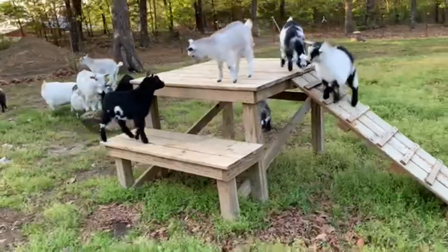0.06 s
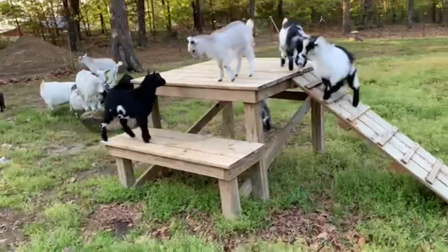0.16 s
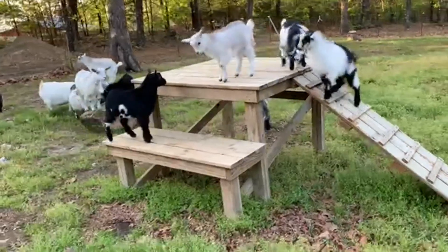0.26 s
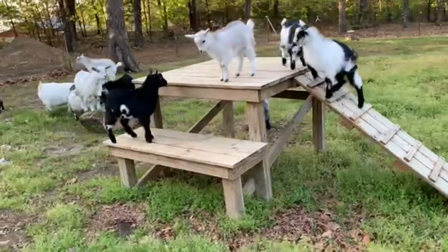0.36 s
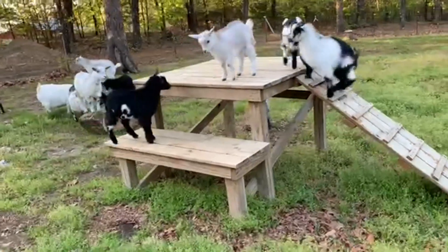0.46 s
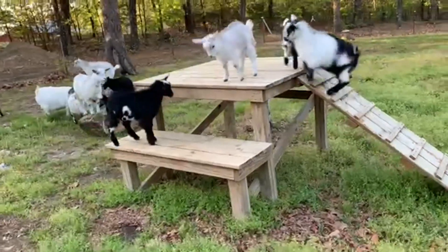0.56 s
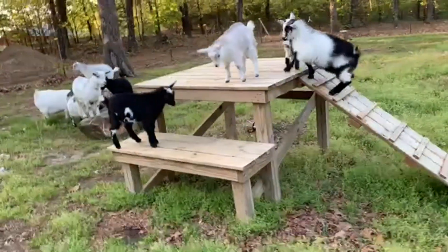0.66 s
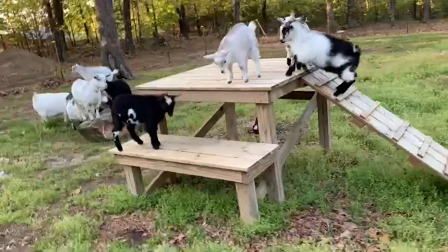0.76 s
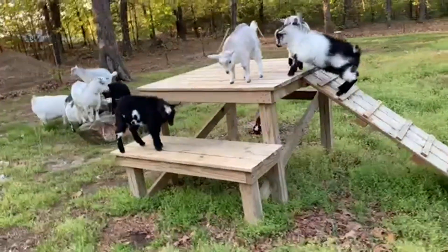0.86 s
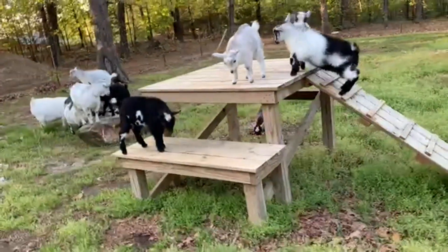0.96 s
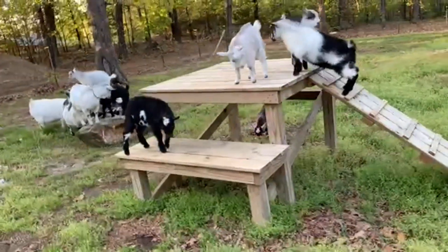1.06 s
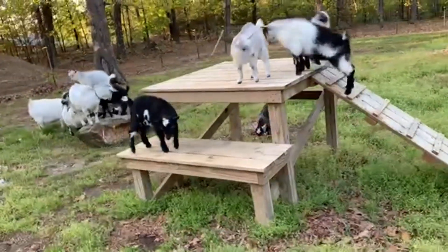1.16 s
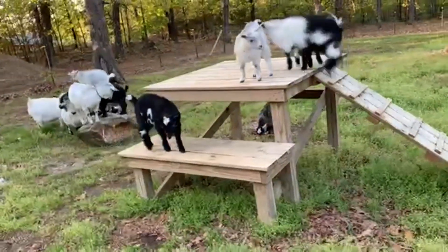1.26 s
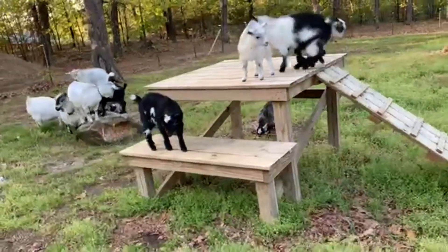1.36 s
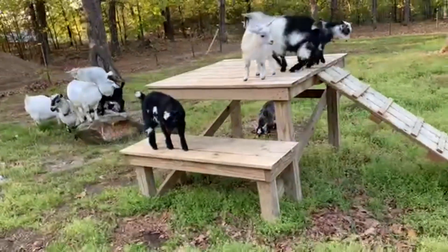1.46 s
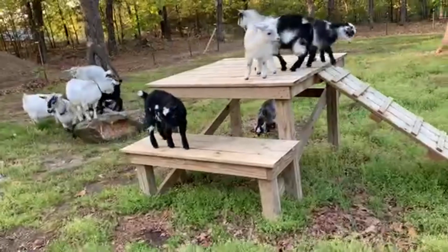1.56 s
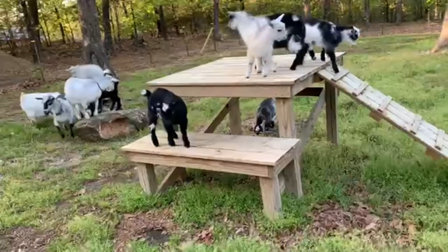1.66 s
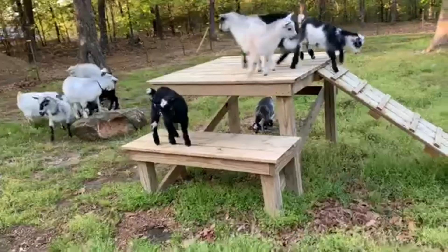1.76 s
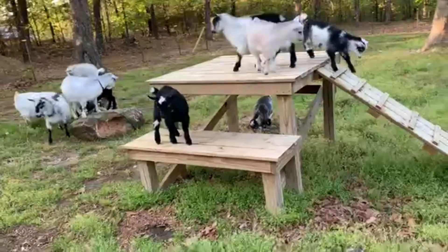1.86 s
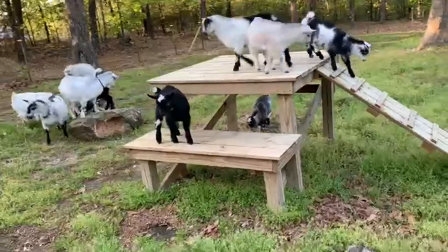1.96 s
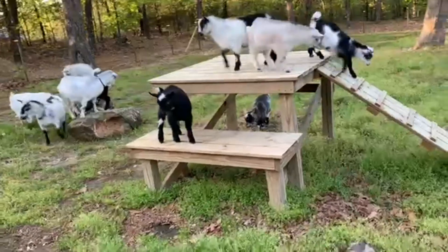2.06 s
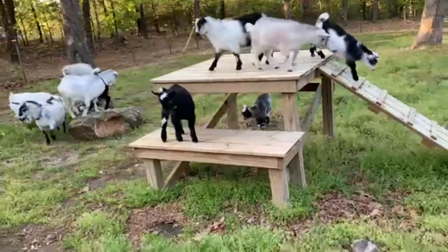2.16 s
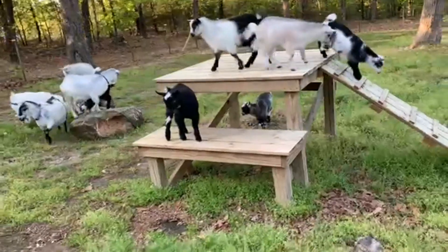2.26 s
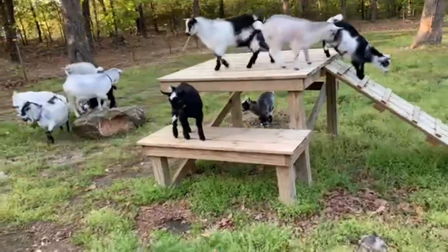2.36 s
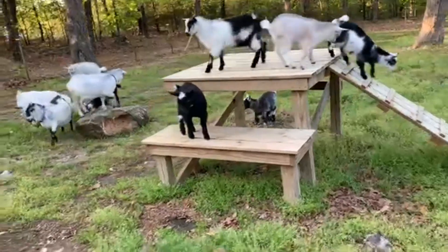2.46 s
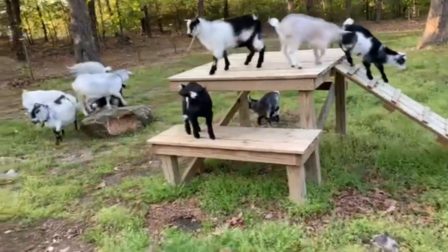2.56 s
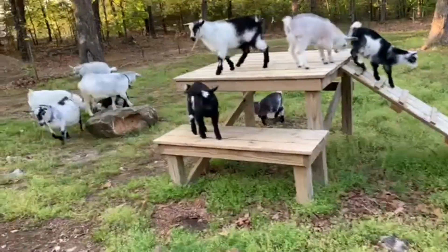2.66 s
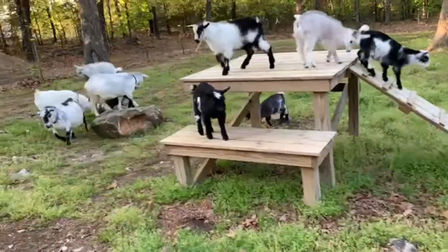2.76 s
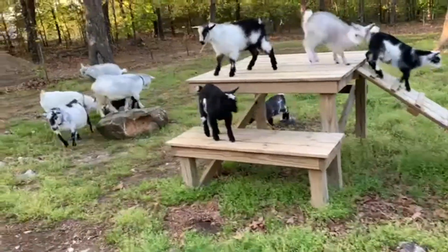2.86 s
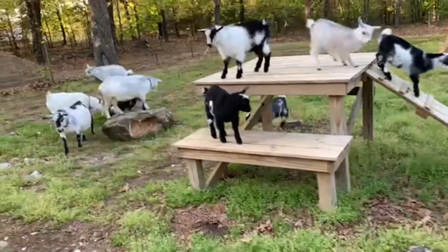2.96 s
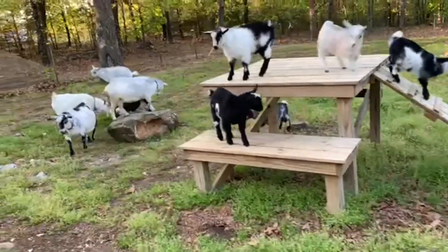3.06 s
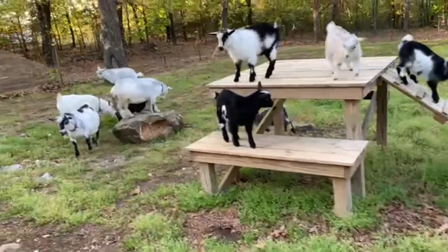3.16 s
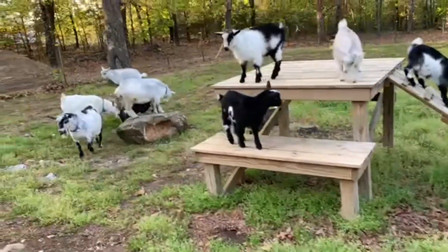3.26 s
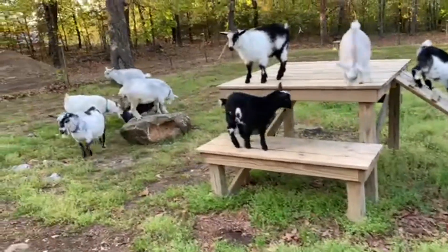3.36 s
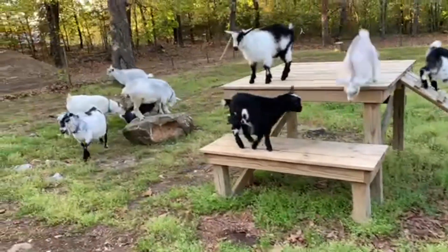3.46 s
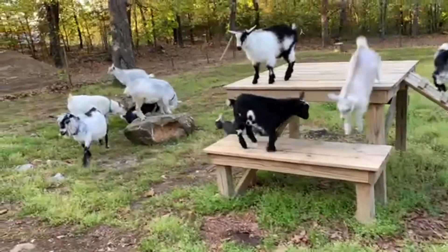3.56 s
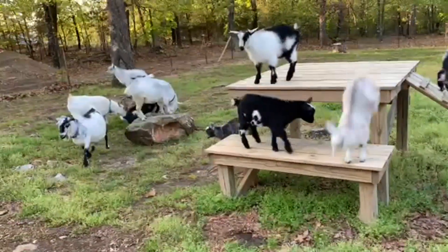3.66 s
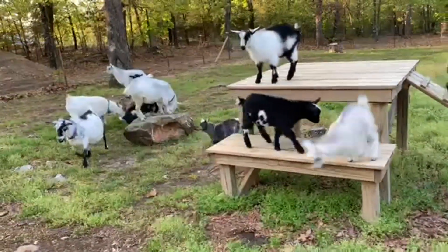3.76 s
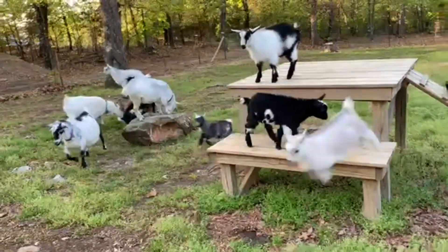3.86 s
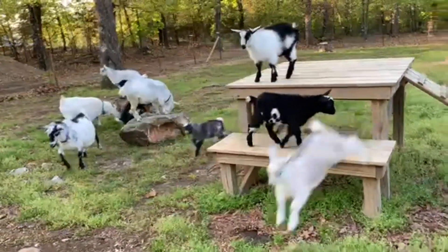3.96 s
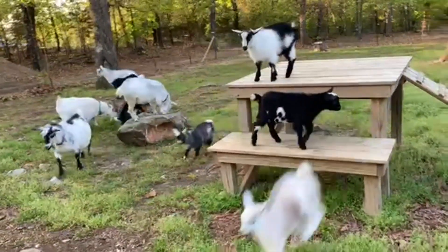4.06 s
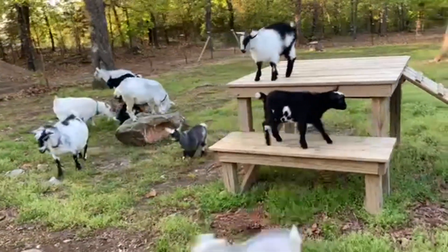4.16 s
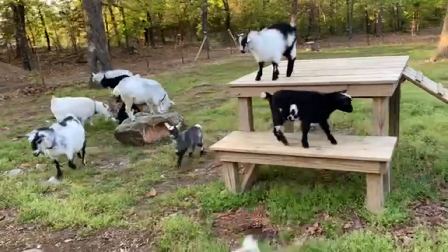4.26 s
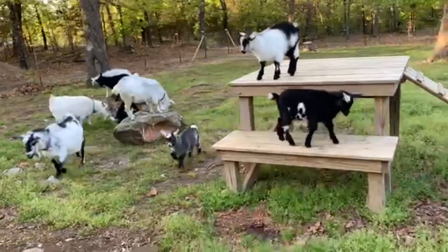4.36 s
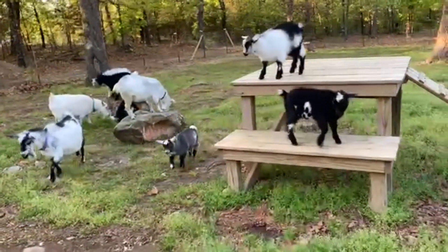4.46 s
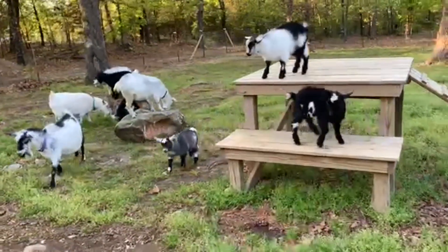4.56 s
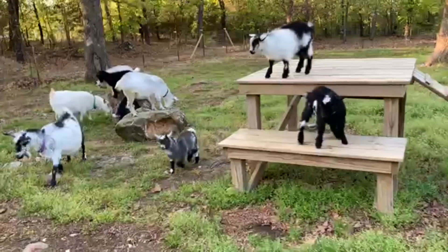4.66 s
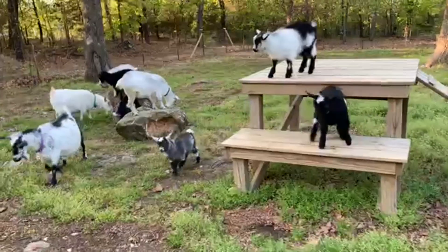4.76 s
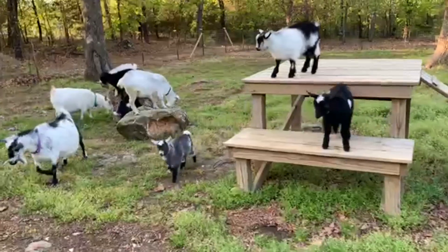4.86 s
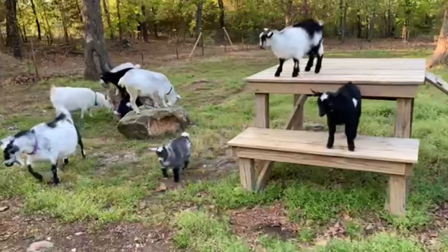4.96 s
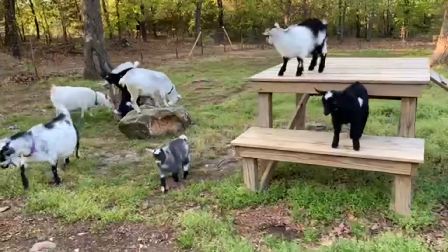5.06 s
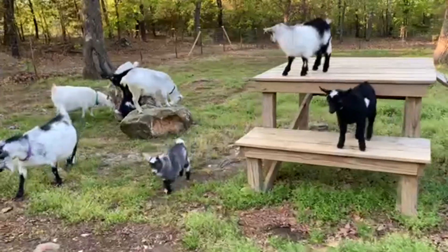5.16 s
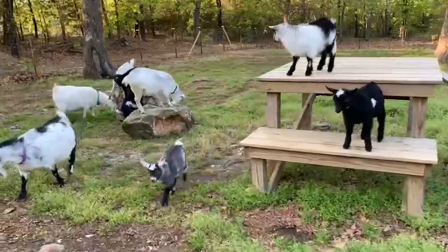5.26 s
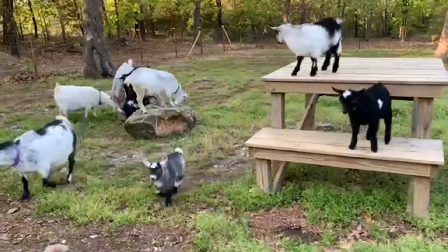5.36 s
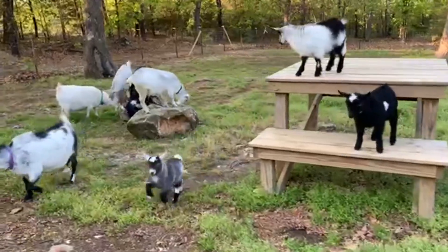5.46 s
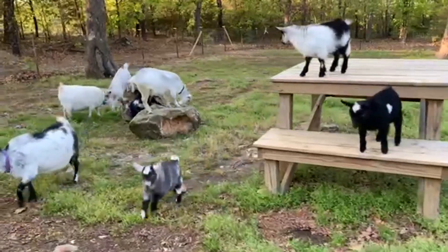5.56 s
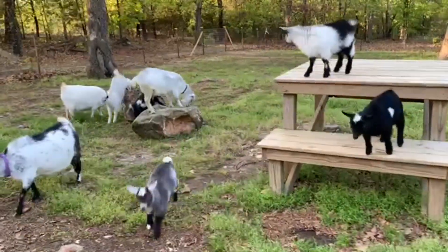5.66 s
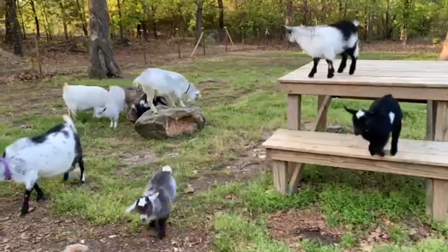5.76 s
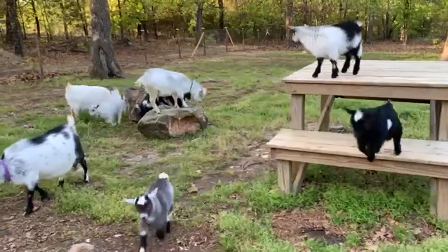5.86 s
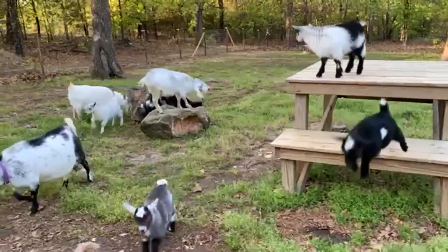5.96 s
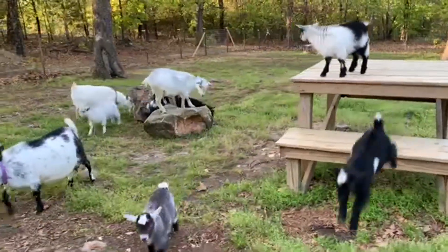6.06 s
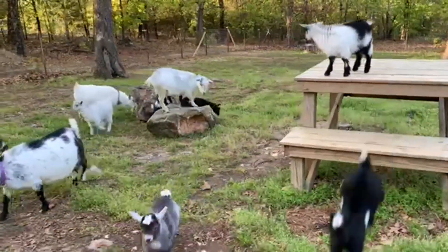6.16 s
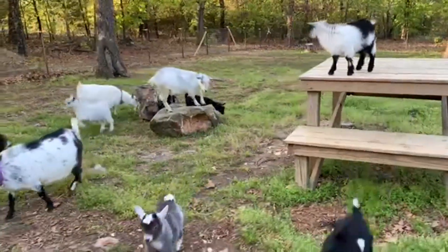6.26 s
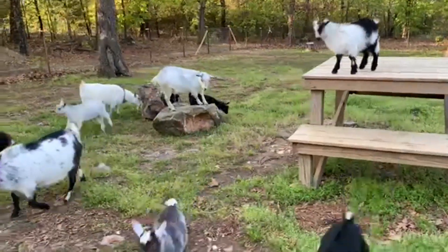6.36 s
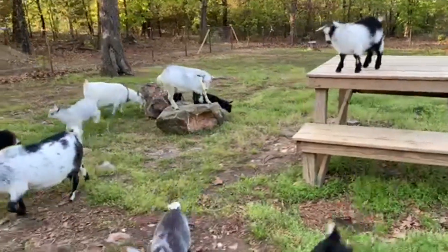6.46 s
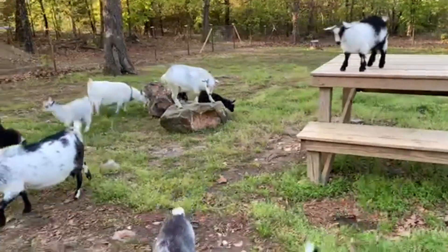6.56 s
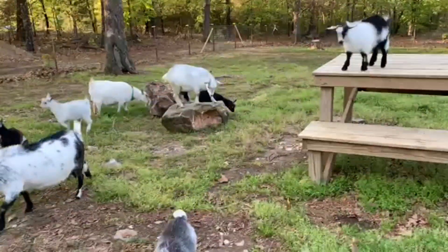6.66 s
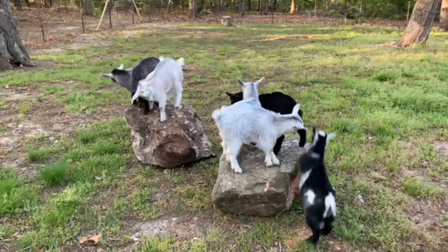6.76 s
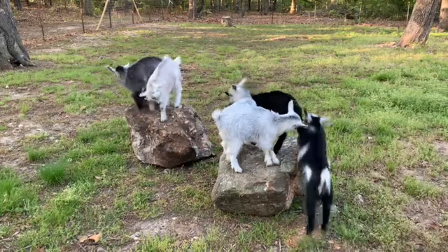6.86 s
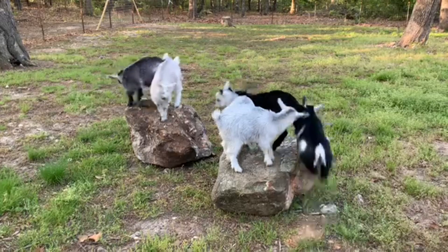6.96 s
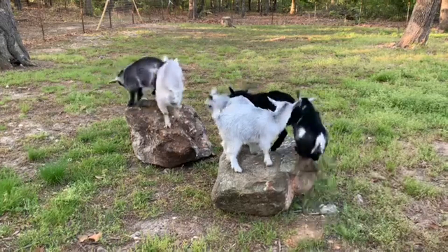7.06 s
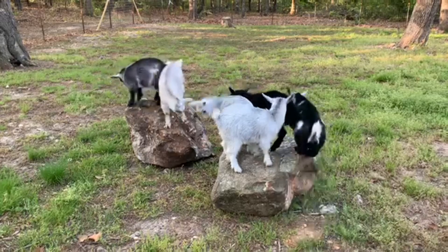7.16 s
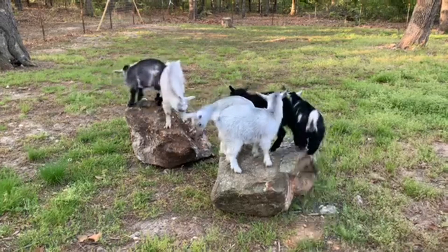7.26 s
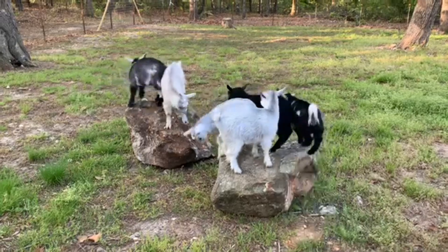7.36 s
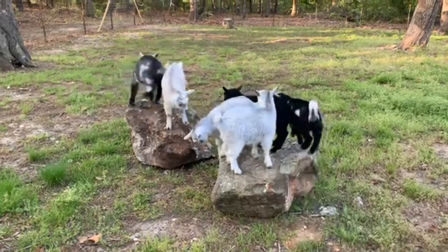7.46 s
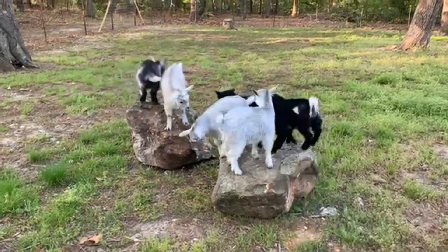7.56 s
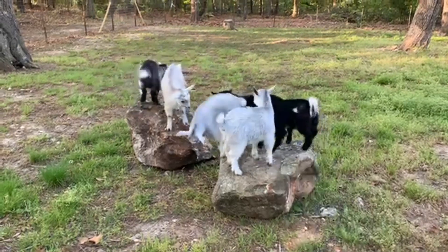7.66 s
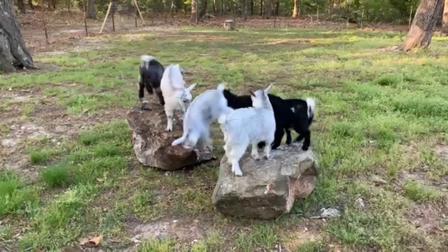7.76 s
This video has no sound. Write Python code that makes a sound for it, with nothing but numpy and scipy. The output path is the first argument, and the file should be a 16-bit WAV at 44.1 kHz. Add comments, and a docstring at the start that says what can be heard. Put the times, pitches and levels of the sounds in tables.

```python
"""Young goats on a wooden play deck

Hooves set the modes of the boards ringing, click as they strike and come down flat in dull thuds.
Close by, feet scuff the earth, crunch and swish through dry grass, and break twigs and a thick stick.
Short bright pings come from a dry stick ringing in a crunch, others perhaps from hooves on stone.
The ground rumbles under the landings, and faint whistles, likely frogs or birds, come from far off.
Two microphone ports pick up the yard and its short echo; near the end the sound dips briefly to silence."""
import sys
import numpy as np
from scipy import signal
from scipy.fft import rfft, irfft, next_fast_len
from scipy.io import wavfile
from scipy.ndimage import uniform_filter1d, map_coordinates

SR = 44100
rng = np.random.default_rng(int(sys.argv[2]) if len(sys.argv) > 2 else 0)


def persist_wave(psi):
    """Save psi, clipped to +-1, as 16-bit WAV."""
    counts = np.round(np.clip(psi, -1, 1) * 32767).astype(np.int16)
    wavfile.write(sys.argv[1], SR, np.atleast_2d(counts).T)


N = 344421

# Short modes of hoof and board edge. Each row: frequency in Hz, level in dB, t60 in seconds.
CLACK_MODES = [(705, 6, 0.026), (940, 4, 0.024), (1150, 7, 0.016), (1400, 3, 0.016), (1710, 0, 0.018),
               (2136, 7, 0.014), (2620, 5, 0.011), (3600, 8, 0.009)]
# Spectra of dry grass, its crackle and its fizz. Each row: frequency in Hz, relative density in dB.
CRACKLE_SPECTRUM = [(1300, -5), (2300, -1), (3300, -3), (4500, 3), (6000, -8), (7500, -2.5), (9000, -23)]
FIZZ_SPECTRUM = [(5500, -7), (7500, -7), (10000, 12.5), (13000, 9), (15500, 9.5), (17000, -27.5)]
# Coherence between the two ports. Each row: frequency in Hz, likeness from 0 to 1.
COHERENCE = [(150, 0.83), (300, 0.95), (1000, 0.66), (3200, 0.16), (6500, 0.66), (8300, 0.75),
             (16000, 0.79)]


def amp(db):
    """Amplitude grows tenfold for every 20 dB."""
    return 10 ** (np.asarray(db) / 20)


def unit(x):
    """Normalisation to an rms of 1."""
    return x / np.sqrt(np.mean(x ** 2) + 1e-20)


def along(points, hz):
    """Interpolation of (Hz, value) points on a logarithmic frequency axis."""
    knots_hz, values = np.transpose(points)
    return np.interp(np.log(hz + 1), np.log(knots_hz + 1), values)


def curves(rows):
    """Linear interpolation in time: one envelope for each column after the first."""
    times, *columns = np.transpose(rows)
    return [np.interp(np.arange(N) / SR, times, column) for column in columns]


def wobble(rate):
    """Smooth random modulation: a spline through rate knots a second."""
    knots = rng.standard_normal(int(N * rate / SR) + 4)
    return map_coordinates(knots, [np.arange(N) * rate / SR])


def filtered(x, response):
    """Linear filtering: the spectrum is multiplied by a complex frequency response."""
    size = next_fast_len(N + 8192)
    return irfft(rfft(x, size) * response(np.fft.rfftfreq(size, 1 / SR)), size)[..., :N]


def grainy(spectrum, spread_db, patchy_db):
    """Tiny snaps of uneven size add up to coloured noise of rms 1, its colour shifting in patches."""
    grains = rng.standard_normal(N) * amp(spread_db * np.minimum(rng.exponential(size=N), 5))
    frames = signal.stft(grains, nperseg=256)[2]
    patches = uniform_filter1d(rng.standard_normal(frames.shape), size=4, axis=0)
    patches = uniform_filter1d(patches, size=8, axis=1)
    patchy = signal.istft(frames * amp(patchy_db * unit(patches)), nperseg=256)[1][:N]
    return unit(filtered(patchy, lambda hz: amp(along(spectrum, hz))))


def add(track, start, sound):
    """Superposition: a sound joins the track at start seconds."""
    part = track[round(start * SR):][:len(sound)]
    part += sound[:len(part)]


def ring(hz, db, t60, t):
    """Free vibration: a sum of damped modes, scaled to a peak of 1."""
    wave = (amp(db[:, None] - 60 * t / t60[:, None]) * np.sin(2 * np.pi * hz[:, None] * t)).sum(0)
    return wave / np.abs(wave).max()


def blows(t, first, density, t60):
    """Impulsive excitation: a first blow, then a dying run of random ones, density of them per sample."""
    train = rng.standard_normal(len(t)) * (rng.uniform(size=len(t)) < density) * amp(-60 * t / t60)
    train[0] = first
    return train


def scuff_and_swish():
    """Friction noise: feet scuff the earth and brush the grass in uneven strokes."""
    # Each row: time in seconds, then levels in dB of scuffing, grass crackle and grass fizz.
    friction_levels = [(0.0, -39.5, -53, -57), (1.32, -53.5, -54.5, -61.5), (1.7, -41, -55, -63),
                       (2.71, -42, -45.5, -53), (3.36, -37.5, -49.5, -60), (4.13, -43, -48, -54),
                       (4.27, -35, -44.5, -44), (5.05, -38.5, -49, -57), (6.38, -39.5, -46.5, -41),
                       (6.66, -45.5, -60.5, -49.5), (6.8, -42.5, -47, -49), (6.844, -37, -64, -63.5),
                       (6.98, -50, -60, -57), (7.3, -40.5, -65, -70.5), (7.81, -53.5, -67.5, -73)]
    # Spectrum of scuffed earth. Each row: frequency in Hz, relative density in dB.
    earth_spectrum = [(76, -5), (130, 3.5), (367, -3.5), (471, -17.5), (574, -6), (699, -22.5), (941, -9),
                      (2500, -22), (3250, -17), (5500, -120)]
    scuff_db, crackle_db, fizz_db = curves(friction_levels)
    stroke, flutter = wobble(23), wobble(99)
    scuff = amp(scuff_db + stroke + 2 * wobble(40)) * grainy(earth_spectrum, spread_db=1, patchy_db=3)
    crackle = amp(crackle_db + 3.1 * stroke + 0.37 * flutter)
    crackle *= grainy(CRACKLE_SPECTRUM, spread_db=2, patchy_db=2)
    fizz = amp(fizz_db + 0.86 * stroke + 0.89 * flutter)
    fizz *= grainy(FIZZ_SPECTRUM, spread_db=1.5, patchy_db=2)
    return scuff, crackle + fizz


def ground_rumble():
    """Ground vibration: many feet merge into low noise; a heavy landing is a few cycles of a low note."""
    # Spectrum of the shaken earth. Each row: frequency in Hz, relative density in dB.
    ground_spectrum = [(20, -88), (33, -20.5), (55, -6.5), (80, -2.5), (110, -8.5), (190, -63)]
    # Strength of the steady rumble. Each row: time in seconds, level in dB.
    rumble_levels = [(0, -46.5), (4.4, -42.5), (6.7, -43.5), (6.75, -50.5)]
    # Heavy landings. Each row: time of the peak in seconds, level in dB, pitch in Hz.
    landings = [(1.733, -33.5, 75), (2.683, -31, 89), (2.963, -26, 107), (3.69, -16.5, 79),
                (3.798, -24.5, 82.5), (4.15, -32.5, 70), (4.395, -28.5, 85), (4.487, -23, 102),
                (4.779, -30, 90), (5.805, -30, 79.5), (6.42, -24, 109.7), (6.477, -25, 100)]
    rise_s, fall_s = 0.018, 0.039
    level_db, = curves(rumble_levels)
    track = amp(level_db + 1.5 * wobble(2.983))
    track *= unit(filtered(rng.standard_normal(N), lambda hz: amp(along(ground_spectrum, hz))))
    t = np.arange(-SR // 20, SR // 5) / SR
    swell = np.where(t < 0, np.exp(-(t / rise_s) ** 2), np.exp(-t / fall_s))
    for peak_s, db, hz in landings:
        add(track, peak_s + t[0], amp(db) * swell * np.sin(2 * np.pi * (hz * t + rng.uniform())))
    return track


def hoof_knocks():
    """Modal resonance: a hoof excites most the modes nearest in pitch to the spot it strikes."""
    # Hooves on boards. Each row: start in seconds, boom level in dB, boom pitch in Hz,
    # clack level in dB, clack pitch in Hz.
    knocks = [(0.007, -9.5, 215, -20.5, 1060), (0.051, -16, 209, -25.5, 1280), (0.204, -41, 250, -24, 1160),
              (0.326, -22, 410, -23, 1130), (0.489, -19, 192, -27, 1190), (0.556, -19.5, 383, -19.5, 1250),
              (0.712, -10.5, 406, -22, 1400), (0.735, -7, 256, -22.5, 940),
              (0.788, -16.5, 380, -26.5, 1530), (0.877, -11, 408, -34, 2100), (0.892, -7.5, 517, -61, 945),
              (1.281, -17, 307, -20, 1060), (1.336, -14.5, 290, -23.5, 1340), (1.409, -22, 185, -27, 1360),
              (1.59, -16.5, 410, -29, 886), (1.696, -13.5, 211, -23, 1520), (1.746, -22, 198, -15, 1060),
              (1.766, -24, 390, -23, 1020), (1.885, -12, 238, -20.5, 1190), (2.205, -13, 200, -21.5, 1080),
              (2.52, -14, 208, -24, 1290), (2.723, -52, 193, -25.5, 1040), (2.935, -7.5, 402, -26, 930),
              (2.939, -5, 182, -57, 915), (3.038, -18, 254, -27, 970), (3.169, -9, 218, -17, 1000),
              (3.438, -20.5, 192, -21, 1130), (3.606, -12.5, 378, -57, 724), (3.65, -6, 460, -12, 1200),
              (3.659, -7, 470, -10, 1140), (3.672, -0.5, 263, -9, 1170), (3.745, -16.5, 600, -26.5, 720),
              (3.77, -5.5, 310, -8.5, 1260), (3.862, -15, 486, -42, 1090), (3.895, -11.5, 208, -26, 1230),
              (4.084, -14.5, 193, -48, 821), (4.172, -11, 244, -29, 1110), (4.201, -8, 370, -19.5, 1150),
              (4.234, -11, 185, -30.5, 1010), (4.334, -6.5, 353, -20, 740), (4.386, -15, 265, -42, 1010),
              (4.418, -8.5, 595, -21, 710), (4.683, -2.5, 296, -14, 770), (4.782, -13, 470, -44, 716),
              (4.882, -16.5, 269, -30, 1900), (5.634, -17, 213, -30, 970), (5.774, -9.5, 285, -19, 1160),
              (5.811, -10, 216, -15, 1120), (6.562, -12.5, 397, -19.5, 1210),
              (6.633, -48, 420, -23.5, 1150), (6.804, -20.5, 312, -32, 1070), (7.205, -21.5, 297, -33, 820)]
    # Modes of the deck. Each row: frequency in Hz, level in dB, t60 as a multiple of the boom's.
    board_modes = [(185.7, -5.5, 1.73), (210.1, -3.5, 1.97), (272, 4.5, 0.71), (316.7, 2.5, 0.78),
                   (380.4, 0.5, 1.2), (417, -2.5, 0.85), (508, -0.5, 1.04), (597, 2, 0.92)]
    usual_t60_s, usual_db, damping = 0.19, -23.5, 0.24
    spot_db, detune = 20.5, 0.03  # loss per unit of log pitch from the struck spot; relative spread
    boom_rise_s, clack_rise_s = 0.0034, 0.0021
    track, t = np.zeros(N), np.arange(SR // 5) / SR
    board_hz, board_db, t60_ratio = np.transpose(board_modes)
    edge_hz, edge_db, edge_t60 = np.transpose(CLACK_MODES)
    for start, boom_db, boom_hz, clack_db, clack_hz in knocks:
        chance = rng.standard_normal((4, len(board_hz)))
        # A heavier hoof damps the board more.
        t60 = np.clip(usual_t60_s * amp(damping * (usual_db - boom_db)), 0.03, 0.3)
        mode_db = board_db - spot_db * np.abs(np.log(board_hz / boom_hz)) + 3 * chance[1]
        boom = ring(board_hz * (1 + detune * chance[0]), mode_db, t60_ratio * t60, t)
        mode_db = edge_db - spot_db * np.abs(np.log(edge_hz / clack_hz)) + 3.1 * chance[3]
        clack = ring(edge_hz * (1 + 2 * detune * chance[2]), mode_db, edge_t60, t)
        scuffle = blows(t[:SR // 20], first=1.4, density=0.035, t60=0.06)  # the hoof slides and settles
        clack = signal.fftconvolve(clack * (1 - np.exp(-t / clack_rise_s)), scuffle)
        add(track, start, amp(boom_db) * boom * (1 - np.exp(-t / boom_rise_s)))
        add(track, start, amp(clack_db) * clack / np.abs(clack).max())
    return track


def sharp_clicks():
    """Transients: snapping twigs and striking hooves ring for two or three cycles, with a noisy tail."""
    # Each row: start in seconds, level in dB, pitch in Hz.
    clicks = [(.452, -33, 9050), (.617, -22.5, 1590), (5.028, -23, 2000), (6.303, -15.5, 4500),
              (0.996, -36, 9000), (1.32, -27, 9000), (5.503, -18, 6100), (5.657, -20, 4200),
              (0.8637, 1, 1340), (0.865, -4.5, 2930), (1.385, -26.5, 4300), (1.912, -24.5, 2560),
              (2.04, -26, 9460), (2.249, -14, 5130), (2.907, -9.5, 3780), (2.661, -14.5, 2780),
              (2.931, -13, 1790), (2.9617, -17.5, 7800), (3.328, -7, 4830), (3.652, -16, 1290),
              (4.3523, -5.5, 2610), (4.537, -1.5, 4360), (4.5965, -6, 3490), (5.341, -14, 4320),
              (5.7285, -8, 8460), (6.3268, -6, 10000), (6.37, -24.5, 5000), (6.413, -11.5, 4420)]
    rise_cycles, decay_cycles = 0.6, 1.37
    track, t = np.zeros(N), np.arange(SR // 50) / SR
    for start, db, hz in clicks:
        envelope = 2 * np.exp(-t * hz / decay_cycles) * (1 - np.exp(-t * hz / rise_cycles))
        click = envelope * np.sin(2 * np.pi * hz * t)
        tail = 0.14 * rng.standard_normal(len(t)) * amp(-60 * t / 0.018)
        add(track, start, amp(db) * (click + tail * min(hz / 8000, 1)))
    return track


def grass_crunches():
    """Crushing noise lasts while a foot drags, then decays: thick stalks sound dull, dry blades fizz."""
    # Each row: start in seconds, dull level in dB, fizz level in dB, drag in seconds,
    # t60 of the crackle in seconds.
    treads = [(0.608, -53.5, -45, 0.011, 1), (0.786, -34.5, -41, 0.0033, 0.042),
              (0.873, -17, -51, 0.0027, 0.0086), (1.41, -40, -75, 0.067, 0.09),
              (1.381, -56, -44.5, 0.0034, 0.95), (1.937, -27.5, -41, 0.011, 0.1),
              (2.034, -72, -46.5, 0.0065, 0.42), (2.243, -24, -30.5, 0.0017, 0.13),
              (2.542, -65, -32.5, 0.0089, 0.13), (2.639, -31.5, -55, 0.03, 0.16),
              (2.776, -43, -38.5, 0.004, 0.74), (2.822, -40, -55, 0.12, 0.16),
              (3.323, -22, -22, 0.002, 0.14), (3.367, -30, -45.5, 0.058, 0.26),
              (3.647, -39.5, -37, 0.0088, 0.86), (3.766, -26, -38, 0.0033, 0.022),
              (3.831, -35, -51, 0.045, 0.036), (4.032, -37, -41, 0.075, 0.31),
              (4.116, -66, -33, 0.0065, 0.091), (4.148, -39.5, -32, 0.016, 0.5),
              (4.331, -28.5, -35, 0.083, 0.082), (4.423, -28, -37, 0.062, 0.033),
              (4.521, -44.5, -24, 0.011, 0.062), (4.616, -44, -40, 0.076, 0.038),
              (4.769, -43, -40.5, 0.0019, 0.36), (4.847, -40.5, -46, 0.06, 0.3),
              (5.15, -34, -50, 0.017, 0.041), (5.169, -23.5, -21.5, 0.0055, 0.085),
              (5.209, -38.5, -41, 0.027, 0.35), (5.336, -39, -45, 0.0045, 0.63),
              (5.456, -43.5, -38, 0.035, 0.41), (5.605, -42.5, -34, 0.075, 0.4),
              (5.721, -36.5, -32.5, 0.011, 0.091), (5.758, -39.5, -37.5, 0.088, 0.22),
              (5.892, -57, -31, 0.029, 0.065), (6.052, -64, -35.5, 0.014, 0.09),
              (6.098, -47, -31.5, 0.12, 0.38), (6.28, -53, -27, 0.058, 0.041),
              (6.355, -46, -26.5, 0.016, 0.31), (6.45, -60.5, -31, 0.019, 0.25),
              (6.552, -38.5, -40, 0.011, 0.51), (7.012, -30.5, -33, 0.038, 0.19),
              (7.03, -40, -42, 0.032, 0.59), (7.259, -45.5, -64, 0.0052, 0.13),
              (7.408, -45.5, -57, 0.0025, 0.28)]
    # Spectrum of thick stalks. Each row: frequency in Hz, relative density in dB.
    stalk_spectrum = [(300, -8.5), (620, -3.5), (800, -3.5), (920, -3), (1620, -9.5), (1900, -11.5),
                      (2400, -14), (3500, -47)]
    crackle, dull, fizz = np.zeros((3, N))
    t = np.arange(SR // 2) / SR
    for start, dull_db, fizz_db, drag_s, t60 in treads:
        envelope = amp(-60 * np.maximum(t - drag_s, 0) / max(t60, 0.01)) * (1 - np.exp(-t / 0.00029))
        crackle_db = dull_db + 0.64 * (fizz_db - dull_db) + 3.5
        add(crackle, start, amp(crackle_db) * envelope)
        add(dull, start, amp(dull_db) * envelope ** 0.33)  # the dull part lasts longest
        add(fizz, start, amp(fizz_db) * envelope ** 1.5)
    clumps = amp(4.2 * wobble(90) - 2.5)  # stalks give way in clumps
    crackle *= clumps * grainy(CRACKLE_SPECTRUM, spread_db=3.8, patchy_db=2.5)
    dull *= grainy(stalk_spectrum, spread_db=1.5, patchy_db=0.5)
    fizz *= clumps * grainy(FIZZ_SPECTRUM, spread_db=3.8, patchy_db=2.5)
    return crackle + dull + fizz


def stick_breaks():
    """Progressive fracture: fibres part in a quick run of cracks that ring a thick stick's halves."""
    # Each row: start in seconds, level in dB, tilt of the overtones in dB per two octaves.
    breaks = [(3.3233, -3, -12.5), (3.337, -5.5, -14), (5.1688, -7, 0), (5.174, -7.5, 1.5)]
    # Modes of the dry stick. Each row: frequency in Hz, level in dB, t60 in seconds.
    stick_modes = [(915, 9, 0.045), (1635, -4, 0.065), (2150, -4, 0.04), (4000, -8, 0.06), (4450, -9, 0.06)]
    track, t = np.zeros(N), np.arange(SR // 8) / SR
    hz, mode_db, t60 = np.transpose(stick_modes)
    for start, db, tilt_db in breaks:
        modes = ring(hz, mode_db + tilt_db * np.log2(hz / hz[0]) / 2, t60, t)
        split = signal.fftconvolve(modes, blows(t, first=3.5, density=0.03, t60=0.02))
        add(track, start, amp(db) * split / np.abs(split).max())
    return track


def far_calls():
    """Frequency and amplitude modulation: each whistle swells and fades, and distance makes it waver."""
    # Each row: start in seconds, length in seconds, pitch in Hz, level in dB.
    whistles = [(3.497, 0.27, 2110, -51), (5.29, 0.55, 2106, -53), (6.767, 0.64, 2016, -52),
                (6.783, 0.78, 982, -54), (7.411, 0.13, 1990, -52.5), (7.57, 0.12, 1990, -53.5),
                (7.7, .2, 1986, -58)]
    waver_hz, flutter_db = 12, 3
    track = np.zeros(N)
    drift_cycles = np.cumsum(waver_hz * wobble(100)) / SR
    flutter = amp(flutter_db * wobble(80))
    for start, length, hz, db in whistles:
        n = np.arange(round(start * SR), min(round((start + length) * SR), N))
        swell = np.abs(np.sin(np.pi * (n / SR - start) / length)) ** 0.25
        tone = np.sqrt(2) * np.sin(2 * np.pi * (hz * n / SR + drift_cycles[n]))
        track[n] += amp(db) * swell * flutter[n] * tone
    return track


def flat_thuds():
    """Heavy damping: a foot landing flat gives a few cycles of a falling note and a faint hoof click."""
    # Each row: start in seconds, level in dB, initial pitch in Hz.
    thuds = [(4.966, -12, 420), (5.026, -7.5, 335), (5.106, -24, 264), (5.217, -20, 334), (5.245, -20, 254),
             (6.202, -16, 335), (6.458, -14.5, 253), (6.497, -11, 340), (7.559, -18, 254)]
    decay_cycles, rise_s = 1.28, 0.001
    track, t = np.zeros(N), np.arange(SR // 10) / SR
    click = ring(*np.transpose(CLACK_MODES), 2 * t)  # an octave up and half as long
    for start, db, hz in thuds:
        cycles = hz * t * (1 - 6.7 * t)
        thud = np.sin(2 * np.pi * cycles) * np.exp(-cycles / decay_cycles) * (1 - np.exp(-t / rise_s))
        add(track, start, amp(db - 11) * min(hz / 300, 1) ** 3 * click)
        add(track, start, amp(db) * thud)
    return track


def bright_pings():
    """Close modes beat in short pings: a dry stick ringing in a crunch, others perhaps hooves on stone."""
    # Each row: start in seconds, level in dB, centre pitch in Hz.
    pings = [(5.618, -19, 3050), (6.099, -17.5, 935), (7.013, -23, 4530), (7.028, -11, 2890),
             (7.043, -7.5, 3860), (7.256, -25.5, 3000), (7.409, -22.5, 2460), (7.405, -30, 3130),
             (7.746, -41, 940)]
    t60_s, rise_s, detune = 0.07, 0.004, 0.035
    track, t = np.zeros(N), np.arange(SR // 8) / SR
    for start, db, hz in pings:
        chance = rng.standard_normal((2, 4))
        cluster = ring(hz * (1 + detune * chance[0]), 3 * chance[1], np.full(4, t60_s), t)
        add(track, start, amp(db) * cluster * (1 - np.exp(-t / rise_s)))
    return track


def ports(x, lag_ms, coherence):
    """Path difference: the left port lags by direction in the bass, by the device's body in the treble."""
    treble_lag_ms, side = 0.192, np.array([[-1], [1]])

    def response(hz):
        treble = np.clip((hz - 3500) / 3000, 0, 1)
        phase_per_ms = np.pi * side * hz / 1000
        low_path = np.sqrt(1 - treble) * np.exp(1j * phase_per_ms * lag_ms)
        high_path = np.sqrt(treble) * np.exp(1j * phase_per_ms * treble_lag_ms)
        return np.sqrt(np.clip(along(coherence, hz), 0, 1)) * (low_path + high_path)
    return filtered(x, response)


def scattered(x):
    """Diffuse sound: the incoherent part reaches the two ports with unrelated phases."""
    frames = signal.stft(x, nperseg=128)[2]
    phases = np.exp(2j * np.pi * rng.uniform(size=(2,) + frames.shape))
    pair = signal.istft(frames * phases, nperseg=128)[1][:, :N]
    return filtered(pair, lambda hz: np.sqrt(2 - 2 * np.clip(along(COHERENCE, hz), 0, 1)))


def yard_echo(x):
    """Reverberation: trees and posts reflect the sound, each frequency dying at its own rate."""
    # Each row: frequency in Hz, t60 in seconds.
    decay_times = [(200, 0.31), (1500, 0.097), (12000, 0.083)]
    hz, t, frames = signal.stft(rng.standard_normal((2, int(0.42 * SR))), SR, nperseg=256)
    decay = amp(-60 * t / along(decay_times, hz)[:, None])
    tails = signal.istft(frames * decay, SR, nperseg=256)[1]
    tails /= np.linalg.norm(tails[0])
    delayed = np.pad(x, (500, 0))
    pair = signal.fftconvolve(delayed[None], tails, axes=1)[:, :N]
    mid = pair.mean(0)  # bass reaches both ports alike
    return mid + filtered(pair - mid, lambda hz: hz ** 2 / (hz ** 2 + 170 ** 2))


def scene():
    """Superposition at two ports: deck ahead, feet close on the left; scuffs and grass partly diffuse."""
    ahead = hoof_knocks() + flat_thuds() + bright_pings()
    cracks = sharp_clicks() + stick_breaks()
    treads = grass_crunches()
    scuff, swish = scuff_and_swish()
    grass = treads + swish
    spread = ports(scuff, 0.22, COHERENCE) + ports(grass, -0.42, COHERENCE) + scattered(scuff + grass)
    point_source = [(1000, 1)]  # fully coherent at every frequency
    hits = ports(ahead, 0.056, point_source) + ports(cracks, -0.45, point_source)
    direct = spread + hits + far_calls() + ground_rumble()
    echo = yard_echo(amp(-11) * ahead + amp(-18) * cracks + amp(-8) * treads)
    return (direct + echo) * amp([[-0.5], [0.6]])


def record(dry):
    """Band limiting: the microphone drops the deepest bass and top treble; the level dips once to zero."""
    silent_from_s, silent_to_s, fade_out_s, fade_in_s = 6.715, 6.742, 0.062, 0.05
    bass_hz, top_hz = 32, 16000
    t = np.arange(N) / SR
    fade_out = np.clip((silent_from_s - t) / fade_out_s, 0, 1) ** 3
    fade_in = np.clip((t - silent_to_s) / fade_in_s, 0, 1)
    dipped = dry * np.maximum(fade_out, fade_in)
    return filtered(dipped, lambda hz: (hz < top_hz) * hz ** 4 / (hz ** 4 + bass_hz ** 4))


dry = scene()
out = record(dry)
persist_wave(out)
```